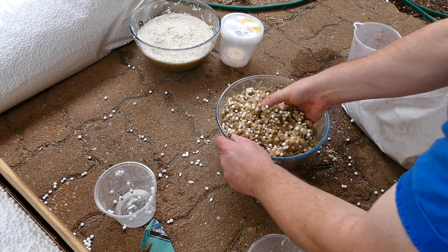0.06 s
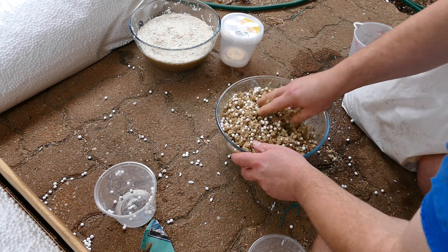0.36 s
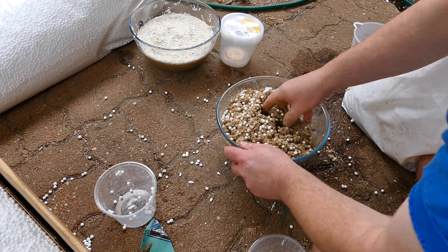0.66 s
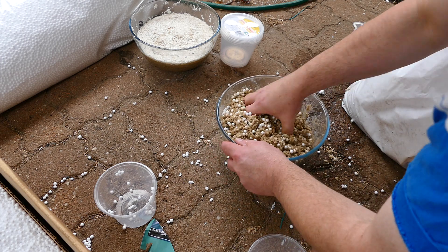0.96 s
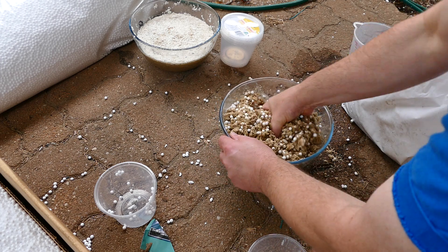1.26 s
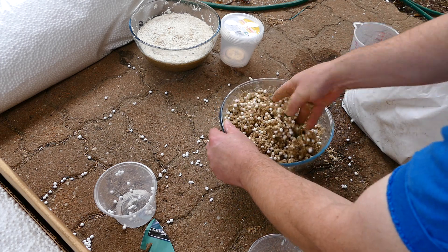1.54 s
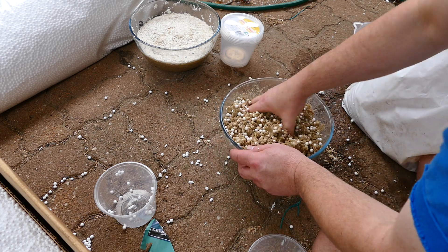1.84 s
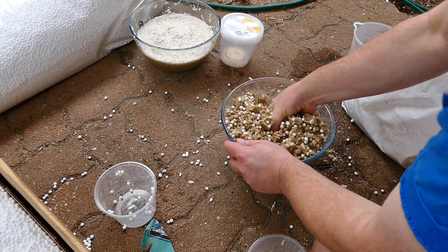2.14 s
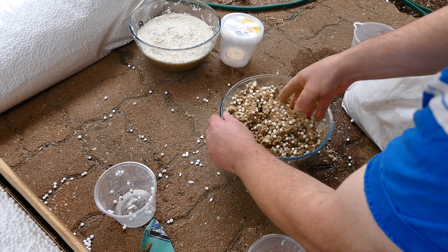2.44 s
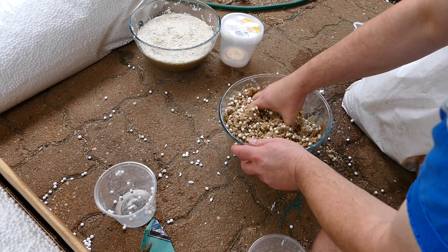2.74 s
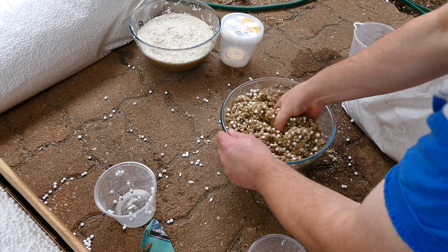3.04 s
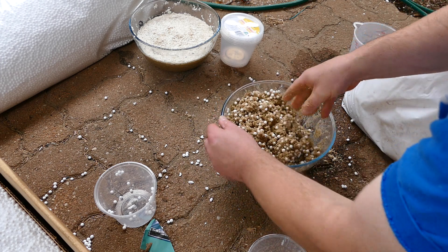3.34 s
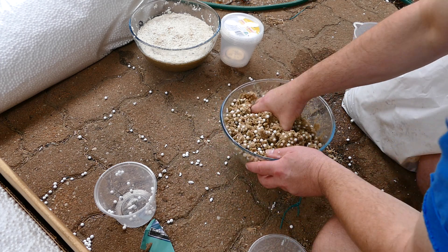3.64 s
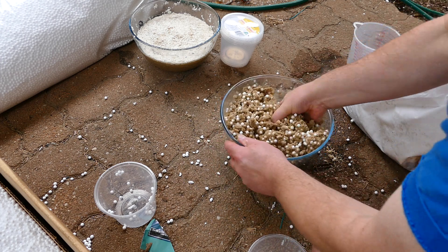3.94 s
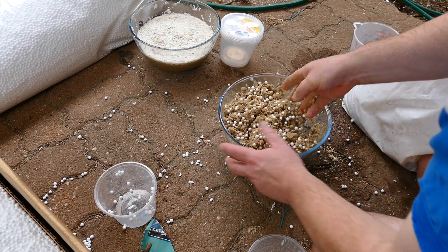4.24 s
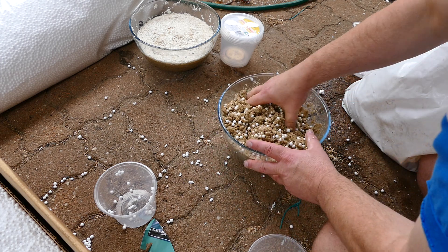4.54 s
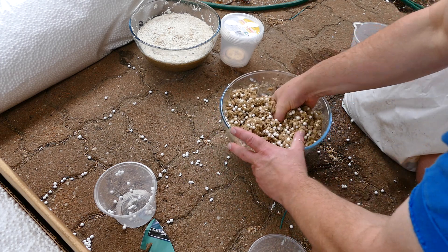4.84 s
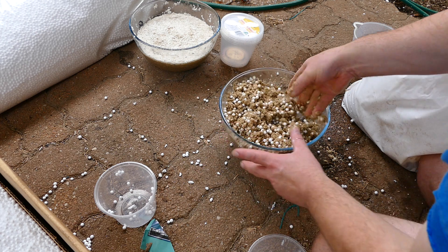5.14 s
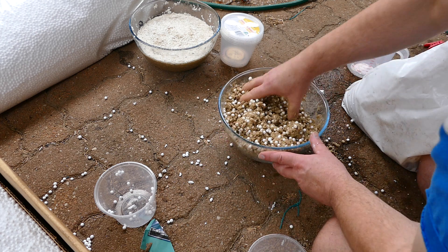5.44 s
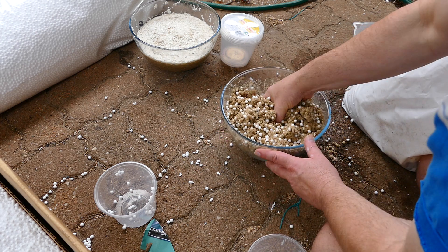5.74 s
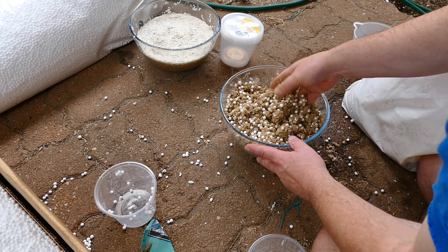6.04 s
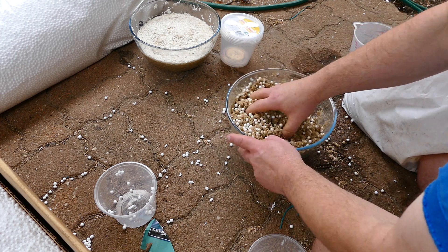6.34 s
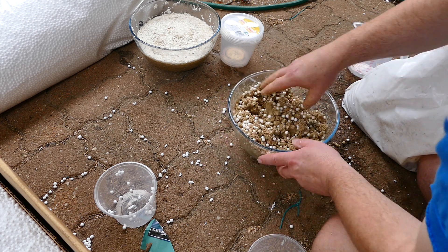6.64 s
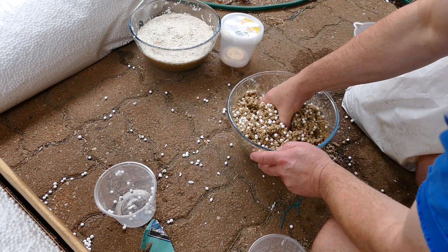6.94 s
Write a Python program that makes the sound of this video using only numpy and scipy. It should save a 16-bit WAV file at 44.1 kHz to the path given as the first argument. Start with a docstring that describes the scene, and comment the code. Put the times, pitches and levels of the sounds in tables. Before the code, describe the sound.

A hand stirs sand and foam beads in a glass bowl that scrapes and knocks on paving, while sparrows chirp nearby.

```python
"""Stirring sand in a glass bowl

A hand stirs sand and foam beads in a glass bowl on the paving of a walled yard. Each stroke sets the
grains hissing and crackling and the beads rustling. The dragged bowl grinds and knocks dully on the
stone. Sparrows chirp nearby, faint twitters come and go, and a distant hum comes up towards the end."""
import sys
import numpy as np
from scipy import signal
from scipy.fft import rfft, irfft, next_fast_len
from scipy.io import wavfile
from scipy.ndimage import uniform_filter1d, minimum_filter1d

SR = 44100
rng = np.random.default_rng(int(sys.argv[2]) if len(sys.argv) > 2 else 0)


def store_pcm(level_fs):
    """Save levels as 16-bit WAV."""
    pcm = np.round(np.clip(level_fs, -1, 1) * 32767).astype(np.int16)
    wavfile.write(sys.argv[1], SR, np.atleast_2d(pcm).T)


N = 317079
SIDE = np.array([[1], [-1]])   # adds to the left ear, subtracts from the right


def from_db(db):
    """Decibels to gain."""
    return 10 ** (np.asarray(db) / 20)


def to_db(power):
    """Power to decibels."""
    return 10 * np.log10(power + 1e-12)


def unit_rms(x):
    """Scale to an rms of 1."""
    return x / np.sqrt(np.mean(x ** 2) + 1e-20)


def automation(rows):
    """Each column of a breakpoint curve at every sample."""
    times, *columns = np.transpose(rows)
    return [np.interp(np.arange(N) / SR, times, column) for column in columns]


def at_hz(points, hz):
    """Read a curve on a log-frequency axis."""
    point_hz, values = np.transpose(points)
    return np.interp(np.log(hz), np.log(point_hz), values)


def attack(t, rise_s):
    """Eases up to 1 at t = 0 and stays there."""
    return np.exp(-np.clip(-t / rise_s, 0, 5) ** 2)


def decay(t, fade_s):
    """Holds at 1 until t = 0, then dies away."""
    return np.exp(-np.clip(t / fade_s, 0, 20))


def swells(rows, steepness):
    """Power of motions (middle, length, level) that speed up and slow down again."""
    power, t = np.zeros(N), np.arange(N) / SR
    for middle, length, db in rows:
        near = slice(*np.searchsorted(t, [middle - 3 * length, middle + 3 * length]))
        distance = np.abs(2 * (t[near] - middle) / length)
        power[near] += from_db(db) ** 2 * .5 ** (distance ** steepness)
    return power


def drift(rate_hz):
    """Smooth random wander with a spread of 1."""
    pole = np.exp(-40 * np.pi * rate_hz / SR)
    noise = rng.standard_normal(N // 20 + 2002)   # one value every 20 samples, plus a run-in
    slow = signal.lfilter([1], [1, -2 * pole, pole * pole], noise)[2000:]
    return np.interp(np.arange(N) / 20, np.arange(len(slow)), unit_rms(slow))


def add(out, start_s, sound):
    """Mix a sound in at its cue."""
    at = max(0, int(start_s * SR))
    out[at:at + len(sound)] += sound[:max(0, N - at)]


def tone(hz):
    """A sine that follows a pitch curve."""
    return np.sin(2 * np.pi * np.cumsum(hz) / SR)


def glides(notes, waver):
    """Thin gliding tones of slightly unsteady pitch."""
    out, unsteady = np.zeros(N), drift(105)
    for start, length, start_hz, end_hz, level_db in notes:
        t = np.arange(int(length * SR)) / SR
        wander = waver * np.take(unsteady, int(start * SR) + np.arange(len(t)), mode="wrap")
        hz = (start_hz + (end_hz - start_hz) * t / length) * (1 + wander)
        add(out, start, from_db(level_db) * np.sqrt(np.sin(np.pi * t / length)) * tone(hz))
    return out


def butter(x, hz, kind, order=2):
    """Causal Butterworth filter."""
    return signal.sosfilt(signal.butter(order, hz, kind, fs=SR, output="sos"), x + 1e-18)


def colour(x, spectrum):
    """Minimum-phase EQ of unit power gain, falling 18 dB an octave beyond the ends of its curve."""
    size = next_fast_len(N + SR // 4, True) // 2 * 2
    hz = np.maximum(np.arange(size // 2 + 1) * SR / size, 1)
    low, high = spectrum[0][0], spectrum[-1][0]
    octaves_outside = np.maximum(np.log2(low / hz), 0) + np.maximum(np.log2(hz / high), 0)
    gain = unit_rms(from_db(at_hz(spectrum, hz) - 18 * octaves_outside))
    cepstrum = irfft(np.log(gain), size)
    cepstrum[1:size // 2] *= 2
    cepstrum[size // 2 + 1:] = 0
    return irfft(rfft(x, size) * np.exp(rfft(cepstrum)), size)[..., :N]


# how alike the two ears are: (frequency [Hz], correlation [0-1])
EAR_CORRELATION = [(60, 0.99), (250, 1), (600, 0.96), (1200, 0.76), (2500, .8), (5000, 0.92), (9000, 0.98),
                   (14000, 0.86)]
def stereo(mid, side):
    """Direct sound in the middle, scattered sound at the sides."""
    size = next_fast_len(N, True)
    hz = np.maximum(np.fft.rfftfreq(size, 1 / SR), 1)
    alike = np.clip(at_hz(EAR_CORRELATION, hz), 0, .999)
    width = np.sqrt((1 - alike) / (1 + alike))
    return mid + irfft(rfft(side, size) * width, size)[:N] * SIDE


def grains(per_s, spread_db):
    """Contacts at random times and of random size, at an rms of 1."""
    sizes = from_db(spread_db * np.minimum(rng.exponential(1, N), 5))
    return unit_rms(sizes * rng.choice([-1, 1], N) * (rng.random(N) < per_s / SR))


def rubbing(level_db, spectrum, per_s, spread_db, clump_db, clump_hz):
    """Friction as tiny slips that come in clumps; a faster stroke makes more of them."""
    rate = per_s * from_db((level_db - np.max(level_db)) / 2)
    force = from_db(level_db) * unit_rms(from_db(clump_db * drift(clump_hz)))
    slips = np.array([grains(rate, spread_db), grains(rate, spread_db)]) * np.sqrt(np.mean(rate) / rate)
    return stereo(*colour(slips * force, spectrum))


def yard_reverb(x, t60, dull_hz):
    """Two independent diffuse tails from between the walls, for mid and side."""
    t = np.arange(int(.8 * SR)) / SR
    tail = rng.standard_normal((2, len(t))) * from_db(-60 * t / t60) * (1 - np.exp(-t / 0.003))
    tail /= np.sqrt(np.sum(tail ** 2, axis=1, keepdims=True))
    return signal.fftconvolve(x[None], butter(tail, dull_hz, "low", order=1), axes=1)[:, :N]


# strokes of the hand: (time [s], attack [s], time to the bottom [s], time to lift-out [s],
# plunge level [dB], push level [dB], sweep level [dB])
HAND_STROKES = [(-.3, .02, 0.3, 0.57, -43, -46, -47.5), (.44, 0.036, 0.052, 0.51, -54.5, -47.5, -54),
                (.92, 0.029, 0.095, 0.66, -36.5, -46, -47), (1.791, 0.029, 0.11, 0.77, -43, -40, -46.5),
                (2.68, 0.031, 0.13, 0.69, -44.5, -41, -48.5), (3.55, 0.012, .15, 0.86, -46, -38.5, -49.5),
                (4.515, 0.026, 0.11, 0.78, -42, -39.5, -49), (5.466, 0.019, 0.12, 1, -34.5, -41, -50),
                (6.795, 0.042, 0.095, .6, -37, -40, -46)]
# the fingers knead a handful: (middle [s], length [s], level [dB])
FINGER_KNEADS = [(1.12, 0.02, -42), (1.235, 0.044, -44), (1.45, 0.065, -47.5), (1.57, 0.046, -56),
                 (2.26, 0.12, -43.5), (2.42, 0.068, -48), (3.245, 0.044, -47.5), (3.92, .04, -44),
                 (4.78, 0.12, -41.5), (5.87, 0.055, -51), (6.22, .04, -47.5), (6.36, 0.17, -46),
                 (7.025, 0.035, -42), (7.17, 0.074, -46)]
def hand(sag_db_per_s=12):
    """Power of four motions: plunging in, pushing the mix against the glass, raking back, kneading."""
    plunge, push, sweep = 0, 0, 0
    for start, entry_s, reach_s, lift_s, plunge_db, push_db, sweep_db in HAND_STROKES:
        t = np.arange(N) / SR - start
        in_mix = attack(t, entry_s) * attack(lift_s - t, 0.087)
        shove = attack(t - reach_s, rise_s=0.096) * decay(t - reach_s, fade_s=0.091)
        slack_db = sag_db_per_s * np.maximum(t - reach_s, 0)
        plunge += (in_mix * from_db(plunge_db) * decay(t - .018, fade_s=.036)) ** 2
        push += (in_mix * from_db(push_db) * shove) ** 2
        sweep += (in_mix * from_db(sweep_db - slack_db)) ** 2
    return np.array([plunge, push, sweep, swells(FINGER_KNEADS, steepness=1.57)])


# bright hiss of sand: (frequency [Hz], relative level [dB])
SAND_EQ = [(2000, -5.5), (3500, -3.5), (5000, -1), (6800, -2.5), (7900, -5), (10000, 0.5), (12000, -4.5),
           (15500, -15)]
def sand_hiss(power, trickle_db=-66):
    """Grains rub past each other under the hand and trickle on between strokes."""
    level_db = to_db(power + from_db(trickle_db) ** 2)
    hiss = rubbing(level_db, SAND_EQ, per_s=31000, spread_db=0.5, clump_db=1.07, clump_hz=60.6)
    return from_db(3.5) * hiss


# crisp top of breaking clumps: (frequency [Hz], relative level [dB])
CRACKLE_EQ = [(2500, -24), (5000, -2.5), (7000, 0.5), (8200, 0), (10500, 6.5), (13000, -3), (15700, -7)]
def sand_crackle(power, fade_s=0.00057, gain_db=-7):
    """Small clumps break at random, each in a snap of about a millisecond."""
    breaks = np.abs(grains(per_s=200, spread_db=9.5))
    snaps = signal.lfilter([1], [1, -np.exp(-1 / (fade_s * SR))], breaks + 1e-18)
    envelope = from_db(to_db(power) + gain_db) * unit_rms(snaps)
    return stereo(*colour(envelope * rng.standard_normal((2, N)), CRACKLE_EQ))


# soft midrange of foam beads: (frequency [Hz], relative level [dB])
BEAD_EQ = [(100, -9), (220, 8), (400, 2), (900, 8), (1500, 5), (2200, -1), (3500, -5.5), (7000, -17.5)]
# a soft, continuous midrange rustle, loudest at the start: (time [s], level [dB])
RUSTLE_BED = [(0.0, -38), (3.64, -47), (3.83, -47), (4.06, -47.5), (5.53, -49), (7.19, -46)]
def bead_rustle(push, knead, bed_db=-1.5, push_db=1.5, knead_db=-9):
    """Foam beads rub under the pressure of the hand, over a soft, continuous rustle."""
    bed = from_db(automation(RUSTLE_BED)[0] + bed_db) ** 2
    level_db = to_db(bed + from_db(push_db) ** 2 * push + from_db(knead_db) ** 2 * knead)
    rustle = rubbing(level_db, BEAD_EQ, per_s=7000, spread_db=-1.0, clump_db=1.16, clump_hz=39.5)
    return from_db(3.5) * rustle


# outdoor ambience: (frequency [Hz], relative level [dB])
AIR_EQ = [(30, -36), (60, 1), (90, 3.5), (125, 14), (170, 1.5), (235, 12), (320, 5), (460, 9.5),
          (880, -13.5), (2400, -6.5), (4300, -4.5), (7800, -19.5), (9900, -11), (15000, -53)]
def yard_air(level_db=-49):
    """A steady, quiet bed of outdoor air."""
    return from_db(level_db) * stereo(*colour(rng.standard_normal((2, N)), AIR_EQ))


# the bowl slides on the stone: (middle [s], length [s], deep scrape level [dB], high scrape level [dB])
BOWL_SLIDES = [(0.013, .08, -31, -35.5), (0.162, 0.065, -33, -36.5), (0.335, 0.13, -48.5, -40.5),
               (0.507, .07, -32.5, -41), (0.719, 0.12, -34.5, -36.5), (1.114, 0.03, -45, -34),
               (1.203, 0.06, -33.5, -29), (1.448, 0.13, -40, -40), (1.6, 0.068, -36.5, -48),
               (1.84, 0.09, -45.5, -43.5), (2.033, 0.041, -35, -30), (2.267, 0.11, -27.5, -32.5),
               (2.446, 0.075, -41.5, -43.5), (2.89, 0.097, -42, -29.5), (2.992, 0.18, -36.5, -41.5),
               (3.302, 0.058, -40.5, -39), (3.636, 0.021, -34.5, -38.5), (3.709, 0.032, -37, -35),
               (3.85, .12, -34, -34), (3.992, 0.091, -30, -36.5), (4.096, 0.077, -36.5, -46),
               (4.841, 0.088, -30.5, -34.5), (4.956, .09, -37, -42), (5.7, 0.085, -43, -37.5),
               (5.853, 0.12, -41, -42), (6.2, 0.13, -42, -38), (6.377, 0.13, -34, -32.5),
               (7.036, 0.061, -33, -37), (7.156, 0.11, -37, -44)]
# the two layers of the scrape: (frequency [Hz], relative level [dB])
DEEP_SCRAPE_EQ = [(90, -18.5), (220, -13), (330, -5), (450, -4), (540, 3), (640, -1.5), (850, -20.5),
                  (2000, -29.5)]
HIGH_SCRAPE_EQ = [(350, -19.5), (560, -7), (670, 5.5), (830, 0), (1000, -10), (1400, -13.5), (2200, -27)]
def bowl_grind(steepness=1.8, deep_creep_db=-11.5, high_creep_db=-9):
    """The foot scrapes over the paving; between slides a faint grating follows the rustle bed."""
    middle, length, deep_db, high_db = np.transpose(BOWL_SLIDES)
    bed_db, = automation(RUSTLE_BED)
    deep_power = swells(zip(middle, length, deep_db), steepness) + from_db(bed_db + deep_creep_db) ** 2
    high_power = swells(zip(middle, length, high_db), steepness) + from_db(bed_db + high_creep_db) ** 2
    deep = rubbing(to_db(deep_power), DEEP_SCRAPE_EQ, 3600, spread_db=0.5, clump_db=2.0, clump_hz=35.4)
    high = rubbing(to_db(high_power), HIGH_SCRAPE_EQ, 3700, spread_db=-1.0, clump_db=3.5, clump_hz=34)
    return from_db(-3) * (deep + high)


# resonances of the loaded bowl: (frequency [Hz], bandwidth [Hz], level [dB])
GLASS_MODES = [(227, 13, -6), (388.5, 8.3, -19.5), (469, 18, -13.5), (552, 10.8, -2.5), (599.7, 17, -11),
               (757, 11, -21), (1000, 390, -7)]
def glass_ring(x):
    """Whatever shakes the bowl also sets its damped modes ringing faintly."""
    out = x.copy()
    for hz, width_hz, level_db in GLASS_MODES:
        radius = np.exp(-np.pi * width_hz / SR)
        feedforward = (1 - radius ** 2) / 2 * np.array([1, 0, -1])
        feedback = [1, -2 * radius * np.cos(2 * np.pi * hz / SR), radius ** 2]
        out += from_db(level_db) * signal.lfilter(feedforward, feedback, x + 1e-18)
    return out


# slapback from the near walls: (delay [s], level [dB])
WALL_ECHOES = [(.01325, -10.5), (.0284, -24)]
def wall_slap(x, dull_hz=1300):
    """Short, dull echoes comb the spectrum of knocks and scrapes alike."""
    out, dull = x.copy(), butter(x, dull_hz, "low", order=1)
    for delay, echo_db in WALL_ECHOES:
        lag = int(delay * SR)
        out[:, lag:] += from_db(echo_db) * dull[:, :-lag]
    return out


# grains pinched against the glass: (time [s], relative level [dB])
PINCHES = [(0.0881, -35), (0.114, -28), (0.917, -19.5), (1.1133, -34), (1.409, -32.5), (1.465, -29),
           (1.5677, -29.5), (2.1944, -36), (2.2339, -29), (2.2564, -27), (2.2714, -30.5), (2.316, -26.5),
           (2.4618, -33), (3.232, -28), (3.6826, -19.5), (3.703, -25), (3.7367, -17), (3.917, -23),
           (4.8106, -22.5), (4.8775, -26.5), (4.9292, -37), (5.606, -20), (5.7474, -29), (6.2066, -32),
           (6.345, -31.5), (6.4566, -32.5), (6.5824, -38.5), (6.794, -23), (6.834, -24), (7.0136, -26)]
def sand_crunches(fade_s=0.0033, gain_db=-5):
    """A pinched clump gives way in a short, bright burst."""
    envelope, t = np.zeros(N), np.arange(SR // 20) / SR
    for start, level_db in PINCHES:
        add(envelope, start, from_db(level_db + gain_db) * np.exp(-t / fade_s))
    return stereo(*colour(envelope * rng.standard_normal((2, N)), CRACKLE_EQ))


# clear bird notes: (time [s], length [s], start pitch [Hz], end pitch [Hz], relative level [dB])
BIRD_NOTES = [(0.16, 0.038, 3380, 3730, -39.5), (0.19, 0.069, 4830, 4830, -44.5),
              (0.41, 0.091, 3370, 3050, -39.5), (0.50, 0.066, 4800, 5330, -36),
              (0.68, 0.051, 5800, 5760, -44), (2.56, 0.058, 4000, 3870, -35),
              (2.60, 0.049, 4560, 4480, -30), (2.60, 0.032, 6800, 6830, -41), (2.66, .03, 5600, 4900, -33),
              (3.44, 0.056, 3140, 3220, -47), (4.28, 0.16, 5280, 5300, -53.5),
              (5.78, 0.058, 4300, 4420, -44), (5.9, 0.12, 4490, 4600, -43), (6.15, 0.044, 3440, 3300, -34),
              (6.195, 0.045, 3150, 3450, -36), (6.25, .11, 3900, 3810, -37.5),
              (7.08, 0.045, 3350, 3030, -39.5), (7.14, 0.06, 3060, 3270, -36),
              (7.11, 0.082, 4850, 4630, -38)]
def bird_whistles(gain_db=-4):
    """Birds slip in thin, nearly pure notes that slide in pitch."""
    return from_db(gain_db) * glides(BIRD_NOTES, waver=.005)


# sparrow cues: (time [s], top pitch [Hz], arched note level [dB], buzzy note level [dB])
SPARROW_CALLS = [(0.568, 4705, -30.5, -31.5), (1.203, 4510, -34, -33.5), (2.18, 4380, -34.5, -38),
                 (2.351, 4135, -38.5, -43), (2.975, 3900, -35.5, -49), (3.657, 4590, -34, -33.5),
                 (3.989, 4730, -31.5, -38), (4.61, 4555, -34.5, -34.5), (5.087, 4450, -34, -32.5),
                 (5.97, 4490, -34, -36), (6.689, 4780, -33, -32.5)]
# contour of one call: (time before stretching [s], pitch [share of top], level [dB], buzz [0-1])
CALL_CONTOUR = [(0, 0.81, 23, 0.46), (.011, .95, -7, 0.17), (.024, .97, 5, 0.53), (0.04, .92, -6, 0.76),
                (.058, .85, -3.5, 0.72), (0.076, .83, -0.5, .9), (.09, .81, 0, 1.0), (.11, .79, -6.5, 0.76),
                (.13, .76, -12, .9), (.16, 0.81, -22, .9)]
def sparrows(buzz_hz=135, buzz_depth=0.15, waver=0.0467, flicker_db=2.0, note_change_s=0.095):
    """An arched note, then a buzzy one, each call at its own pace; the buzz shakes pitch and level."""
    out, unsteady, flicker, intonation = np.zeros(N), drift(375), drift(110), drift(23.9)
    times, *contour = np.transpose(CALL_CONTOUR)
    for start, top_hz, arch_db, buzzy_db in SPARROW_CALLS:
        buzz_phase, pace = rng.random(2)
        stretch = 1.1 + 0.0973 * pace
        t = np.arange(int(times[-1] * stretch * SR)) / SR
        pitch, shape_db, buzz = (np.interp(t, times * stretch, column) for column in contour)
        note_db = np.interp(t - note_change_s, [-.01, .01], [arch_db, buzzy_db])
        now = np.minimum(int(start * SR) + np.arange(len(t)), N - 1)
        shake = buzz * np.sin(2 * np.pi * (buzz_hz * t + buzz_phase))
        bend = 1 + buzz_depth * shake + waver * buzz * unsteady[now] + 0.025 * intonation[now]
        loudness = from_db(note_db + shape_db + flicker_db * flicker[now]) * (1 - 0.098 * shake)
        add(out, start, loudness * attack(t - .015, .009) * tone(top_hz * pitch * bend))
    return out


# the bowl rocks onto the stone: (time [s], relative peak [dB], pitch [Hz])
BOWL_HITS = [(1.0052, -21, 580), (1.0075, -2, 650), (1.224, -17, 720), (1.561, -15, 620),
             (1.569, -9.5, 560), (2.2578, -18.5, 540), (2.8203, 0, 663), (2.8234, -6, 620),
             (2.825, -11, 1060), (3.219, -19.5, 570), (3.234, -3.5, 610), (3.262, -9.5, 545),
             (3.731, -6.5, 710), (3.734, -15.5, 383), (3.982, -18, 572), (4.605, -16, 506), (4.61, -7, 610),
             (5.601, -20, 606), (5.608, 2.5, 558), (5.6095, -11, 686), (5.83, -25.5, 440),
             (6.884, -10.5, 565)]
def bowl_knocks(ring_s=0.0024, soft_hz=1350, low_cut_hz=190, gain_db=-1):
    """Sand damps the glass, so each soft contact rings for a few cycles; the yard adds a short tail."""
    direct, t = np.zeros(N), np.arange(SR // 20) / SR
    for start, peak_db, hz in BOWL_HITS:
        ring = np.sin(2 * np.pi * hz * t) * np.exp(-t / ring_s)
        softened = butter(ring, soft_hz, "low", order=6)
        knock = butter(softened, low_cut_hz, "high", order=3)
        add(direct, start, from_db(peak_db + gain_db) * knock / np.max(np.abs(knock)))
    early = from_db(-10) * yard_reverb(direct, t60=0.25, dull_hz=4000)
    late = from_db(-18) * yard_reverb(direct, t60=0.47, dull_hz=2500)
    mid, side = early + late
    return direct + butter(mid, 230, "high", order=1) + from_db(-6.5) * butter(side, 780, "high") * SIDE


# faint high twittering: (start [s], end [s], level [dB])
HIGH_TWITTERS = [(2.12, 2.271, -45.5), (2.814, 2.938, -47.5), (5.783, 6.31, -54.5), (6.981, 7.146, -46)]
def high_twitters(per_s=130, lowest_hz=4300, length_s=.025):
    """Flurries of brief, thin, gliding tones scattered over an octave."""
    notes = []
    for start, end, level_db in HIGH_TWITTERS:
        for when, octave, glide, softness in rng.random((int(per_s * (end - start)), 4)):
            hz = lowest_hz * 2 ** octave
            end_hz = hz * (1 + 0.19 * (glide - .5))
            notes.append((start + when * (end - start), length_s, hz, end_hz, level_db - 6 * softness))
    return glides(notes, waver=0.011)


# partials of the hum: (frequency [Hz], level before the swell [dB])
HUM_PARTIALS = [(86, -62), (139, -59), (200, -56.5), (242, -60)]
# its swell towards the end: (time [s], gain [dB])
HUM_FADER = [(0, -3), (5.6, -9), (6.3, 0.5), (6.7, 2.5), (7.19, 6.5)]
def distant_hum(waver_db=4.5):
    """Low, far-off tones, each wavering in level and slightly in pitch."""
    hum = np.zeros(N)
    for hz, level_db in HUM_PARTIALS:
        amplitude = np.sqrt(2) * from_db(level_db + waver_db * drift(4.5))
        hum += amplitude * tone(hz * (1 + 0.00357 * drift(2.96)))
    return from_db(automation(HUM_FADER)[0]) * hum


def grain_shimmer(x, depth_db=2.5, rate_hz=18):
    """Clumps of different grain size take turns, so the colour of the hiss keeps changing."""
    size = next_fast_len(N, True)
    hz, spectrum = np.fft.rfftfreq(size, 1 / SR), rfft(x, size)
    centres_hz = [3500, 5500, 8000, 10500, 13500]
    out = np.zeros_like(x)
    for weights in np.eye(len(centres_hz)):
        band = irfft(spectrum * np.interp(hz, centres_hz, weights), size)[:, :N]
        out += band * unit_rms(from_db(depth_db * drift(rate_hz)))
    return out


def bowl_reflections(x, bounce=0.029):
    """The rustle bounces between the walls of the bowl, which ripples its spectrum."""
    out = x.copy()
    for delay_s in (.00062, .00147, .0039):
        lag = int(delay_s * SR)
        out[:, lag:] += bounce * x[:, :-lag]
    return out / np.sqrt(1 + 3 * bounce ** 2)


def stirring():
    """Every motion makes the sand hiss; under pressure it breaks into crackle and the beads rustle."""
    motions = hand()
    _, push, _, knead = motions
    crackle_share = np.array([0.12, 0.23, 0.27, 0.51])   # plunge, push, sweep, knead
    hiss = sand_hiss((1 - crackle_share) @ motions)
    detail = sand_crackle(crackle_share @ motions) + sand_crunches() + high_twitters()
    return bowl_reflections(grain_shimmer(hiss + detail)) + bead_rustle(push, knead)


def across_the_yard(song, direct_db=-4, wet_db=-2):
    """The birds are some way off, so much of their song arrives by the walls."""
    mid, side = yard_reverb(song, t60=0.34, dull_hz=9200)
    return from_db(direct_db) * song + from_db(wet_db) * (mid + from_db(-7.5) * side * SIDE)


def scene():
    """Rustle in the bowl, its foot on the stone, and the yard around."""
    rustle = stirring()
    foot = wall_slap(glass_ring(bowl_grind() + bowl_knocks()))
    foot *= from_db(-0.15 * SIDE)   # a touch to the right
    birds = across_the_yard(sparrows() + bird_whistles())
    return rustle + foot + birds + yard_air() + distant_hum()


def record(dry):
    """A fast limiter holds the hardest knocks near full scale, and a steep low-pass trims the top."""
    window, cutoff_hz = SR // 200, 15750
    allowed = 1 / np.maximum(np.max(np.abs(dry), axis=0), 1)
    gain = uniform_filter1d(minimum_filter1d(allowed, size=window), size=window)
    return signal.sosfilt(signal.ellip(10, .1, 80, cutoff_hz, fs=SR, output="sos"), dry * gain)


dry = scene()
out = record(dry)
store_pcm(out)
```